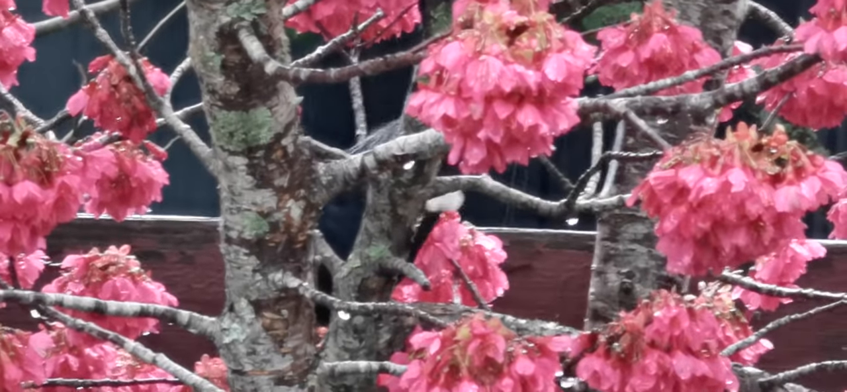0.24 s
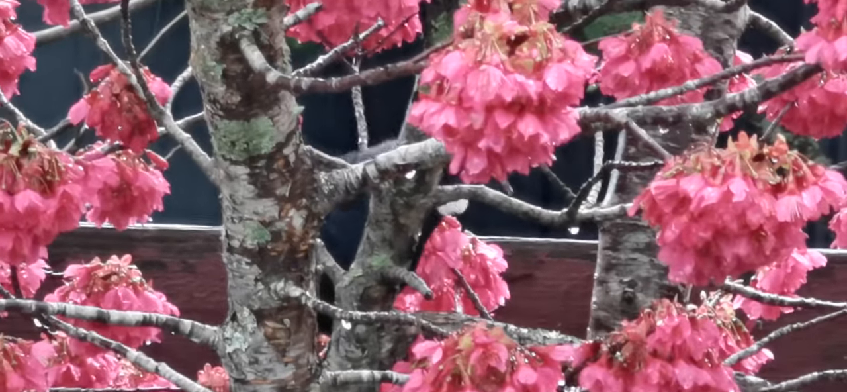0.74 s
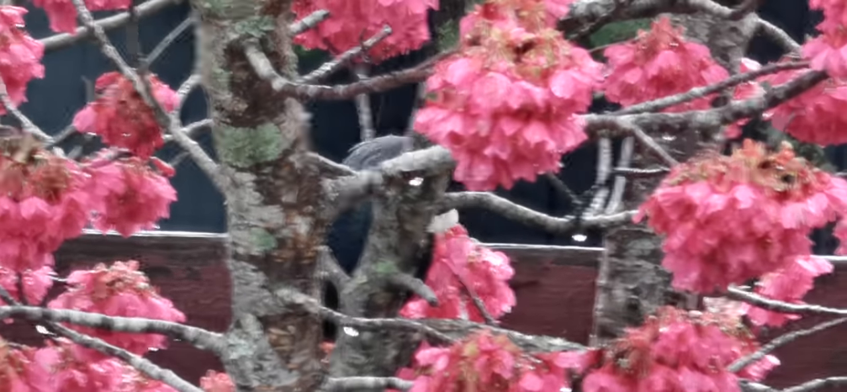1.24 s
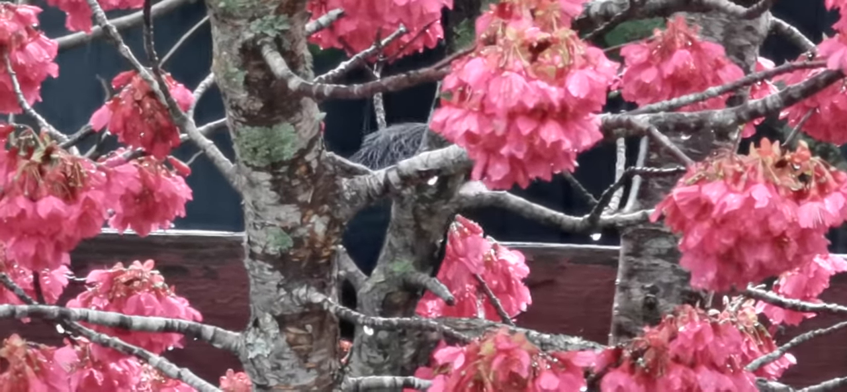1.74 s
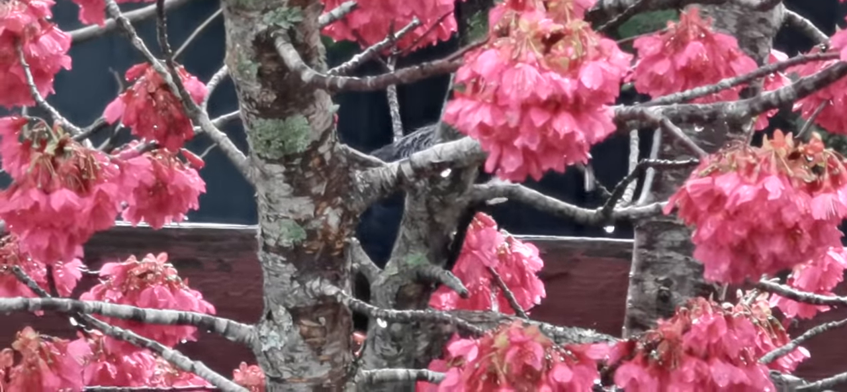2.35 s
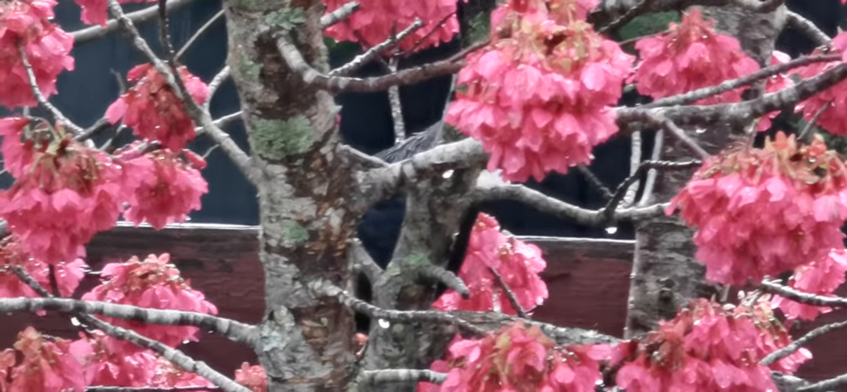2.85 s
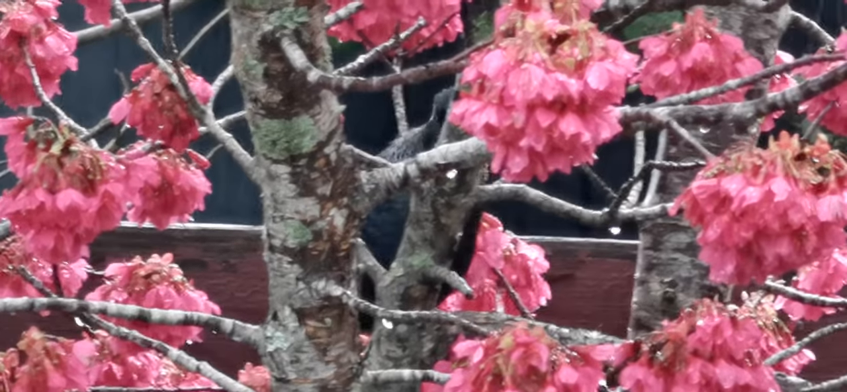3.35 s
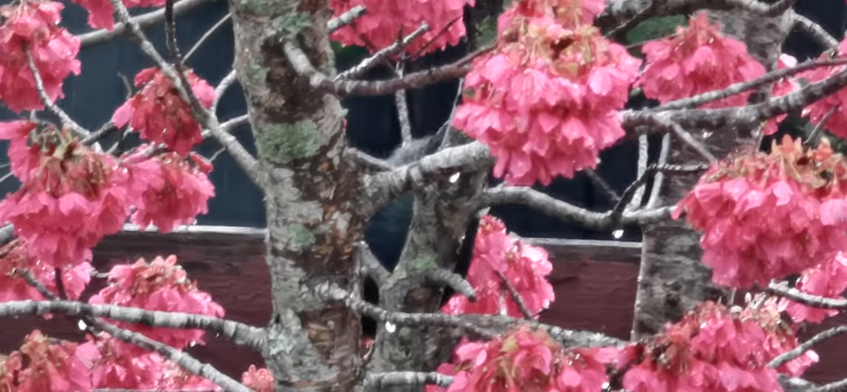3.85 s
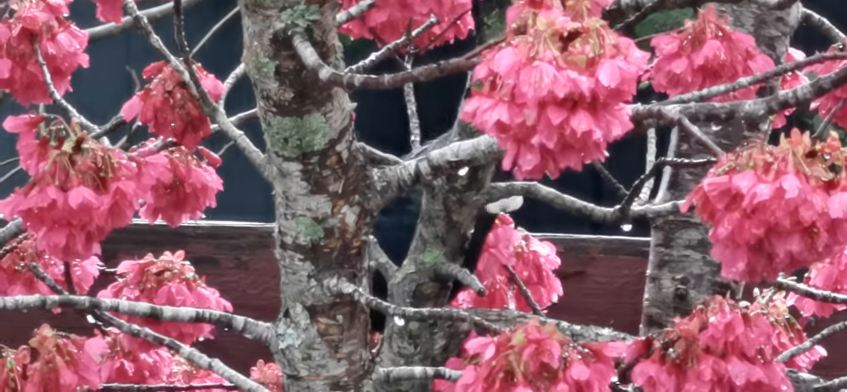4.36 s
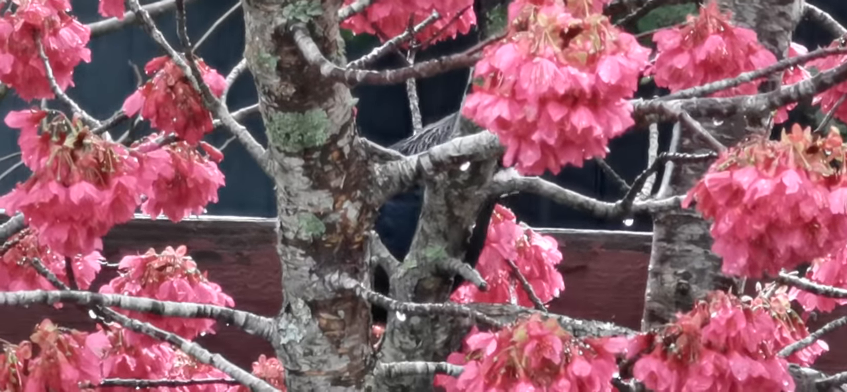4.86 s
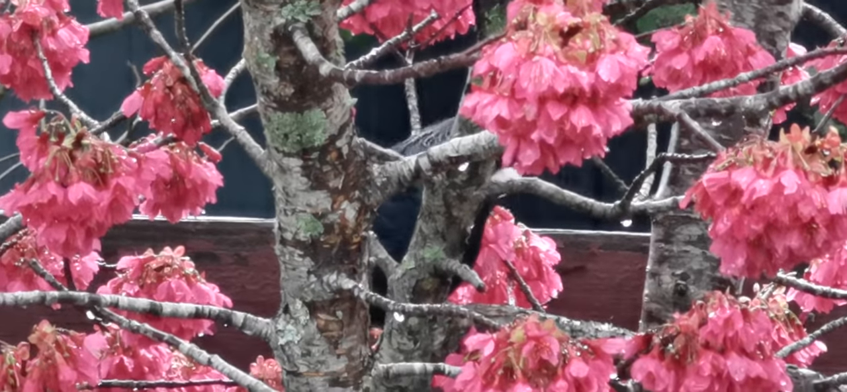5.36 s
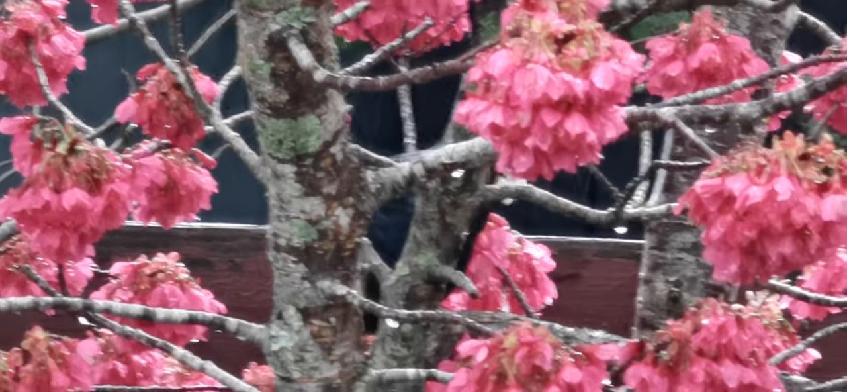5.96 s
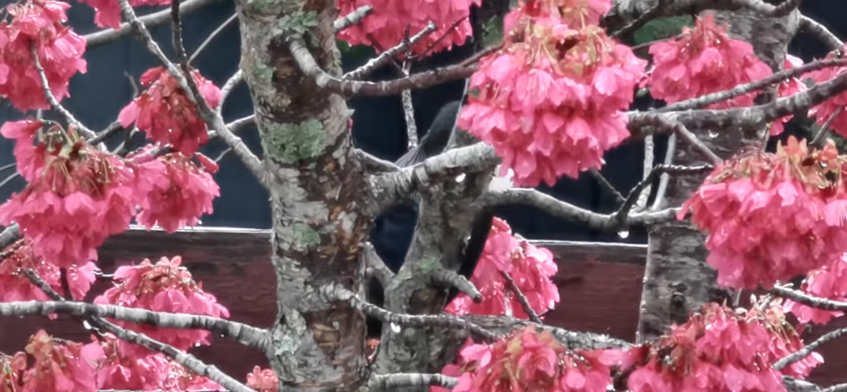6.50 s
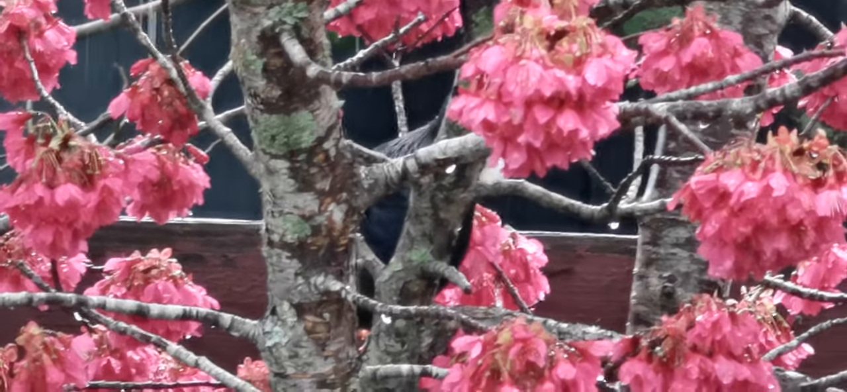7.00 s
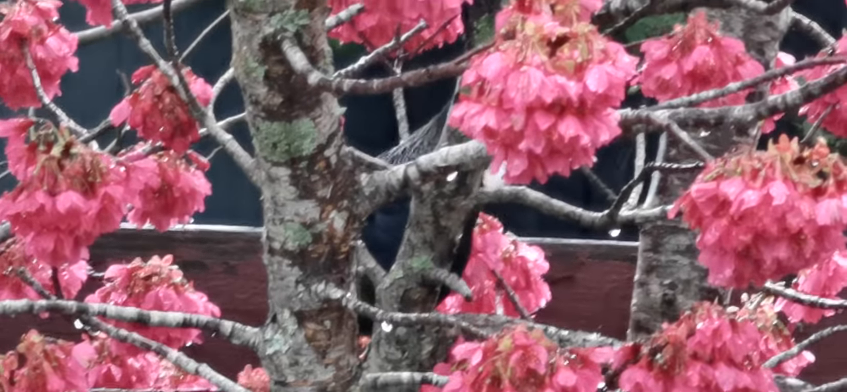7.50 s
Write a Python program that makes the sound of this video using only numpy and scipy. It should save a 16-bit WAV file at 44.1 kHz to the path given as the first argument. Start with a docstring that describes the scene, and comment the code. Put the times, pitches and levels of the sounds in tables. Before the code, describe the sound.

Over faint outdoor rumble and a distant machine's wavering hum, one bird calls from a tree just right of the microphone. Scattered high chirps, falling whistles and bell-like notes, often two pitches at once, mix with rasps and soft clicks. Two loud squawks about a second apart lead to a quick hollow rattle, then dense twittering and squeaks continue to the end. Each call has a short garden echo.

```python
"""A tui in a flowering cherry tree, close to a camera's stereo microphone and to its right.
Over faint rumble and a distant machine's hum it opens with pure bell notes, fast high chirps and
squeaks, often two at once from the two sides of its syrinx. Hoarse rasps join after a second, dry
clicks later. Two loud squawks at 3.6 and 4.7 s lead to a throaty rattle at 5.1 s, then the quick notes
run on to the end. All along, a fence and the trees around give a short echo."""
import sys
import numpy as np
from scipy import signal
from scipy.fft import rfft, irfft, next_fast_len
from scipy.io import wavfile
from scipy.ndimage import map_coordinates

SR = 44100
rng = np.random.default_rng(int(sys.argv[2]) if len(sys.argv) > 2 else 0)


def put_to_file(sound):
    """Save the sound as 16-bit audio at rate SR, in the file named by the first command-line argument."""
    columns = np.atleast_2d(sound).T  # one column per channel
    safe = np.clip(columns, -1, 1)
    whole_steps = np.round(safe * 32767)
    wavfile.write(sys.argv[1], SR, whole_steps.astype(np.int16))


N = 341334

# Levels in the tables are relative; each source sets its own gain on top.
# outdoor air: (frequency [Hz], level [dB])
AIR_SPECTRUM = [(20, -1), (150, -1), (500, -16.5), (800, -12.5), (1200, -21), (2000, -19.5), (3000, -22.5),
                (5000, -21), (8000, -29.5), (15500, -35.5)]
# how alike the outdoor rumble and hiss are at the two microphones: (frequency [Hz], likeness [0-1])
AIR_LIKENESS = [(100, 0.98), (400, 0.65), (2500, 0.22)]
# partials of the distant machine: (pitch [Hz], level [dB])
HUM_PARTIALS = [(119.5, -65.5), (159, -65), (199, -69.5)]
# drift of its hum: (time [s], level [dB])
HUM_DRIFT = [(0, -2), (1.2, -4), (1.5, 8.5), (1.9, -8.5), (2.65, 5), (3.1, -3.5), (6.9, 1.5), (7.2, 8.5),
             (7.5, -1.5)]

# held pure notes: (time [s], core length [s], pitch [Hz], level [dB])
BELL_NOTES = [(.01, 0.12, 6870, -62.5), (0.019, 0.094, 3413, -62), (0.04, 0.089, 1712, -62),
              (.098, 0.13, 2280, -62.5), (0.314, 0.04, 4897, -43), (1.355, 0.068, 4187, -50),
              (1.363, 0.074, 2613, -52.5), (1.37, 0.062, 1622, -58.5), (2.725, 0.073, 2094, -51.5),
              (2.975, 0.033, 1830, -57), (3.854, 0.082, 1058, -43), (3.727, 0.029, 425, -62.5),
              (3.998, 0.076, 365.4, -60), (4.08, 0.15, 530, -66), (4.094, 0.12, 1071, -46.5),
              (4.309, 0.045, 461, -61.5), (5.613, 0.022, 1333, -57.5), (5.615, 0.032, 4080, -59.5),
              (6.148, 0.036, 3563, -46), (6.151, 0.05, 10740, -59.5), (6.22, 0.1, 2070, -42.5),
              (6.919, 0.077, 940, -54), (6.955, 0.064, 4303, -59), (7.112, 0.053, 5100, -59),
              (7.114, .06, 2560, -66), (7.309, 0.31, 1082, -63.5), (7.651, 0.041, 3383, -59)]
# overtones let out by the beak: (frequency [Hz], level [dB])
BEAK_OVERTONES = [(2000, -13), (3000, -18.5), (4300, -9), (5600, -14), (8000, -26), (13000, -23),
                  (17000, -28)]
# air rushing through the syrinx: (frequency [Hz], level [dB])
HISS_SPECTRUM = [(600, -29), (2500, -8), (4200, -3), (5800, -2.5), (8200, -1.5), (9500, -10), (11000, -2),
                 (15500, -9)]
# rough sliding notes: (time [s], length [s], start pitch [Hz], end pitch [Hz], level [dB])
BUZZ_NOTES = [(.08, 0.066, 11900, 10200, -58), (0.542, .025, 5450, 5840, -51),
              (0.905, 0.04, 3760, 2614, -58.5), (1.172, .016, 5200, 6500, -45.5),
              (1.518, 0.066, 5500, 4870, -57.5), (1.612, 0.042, 3900, 4440, -55),
              (1.787, 0.012, 7400, 10000, -42.5), (2.214, 0.02, 1710, 967, -47),
              (2.247, .08, 4990, 5600, -57), (2.401, 0.035, 7200, 10000, -50.5),
              (3.042, 0.016, 5970, 4580, -49), (3.471, 0.095, 5110, 3440, -57.5),
              (4.882, .034, 1672, 1049, -33), (5.045, 0.057, 9470, 8440, -46.5),
              (5.876, .022, 7400, 9900, -48), (5.943, .03, 1650, 1297, -55),
              (5.958, 0.037, 3540, 2060, -48.5), (5.97, .04, 5260, 4530, -54.5),
              (6.197, 0.018, 5070, 6620, -48), (6.671, .055, 1750, 2400, -55.5),
              (6.723, .06, 4540, 5470, -60.5), (7.252, .05, 8280, 10480, -45),
              (7.281, 0.039, 1184, 716, -51.5), (7.388, 0.073, 5050, 5090, -56.5),
              (7.44, 0.026, 1745, 1214, -50.5), (7.565, .044, 8060, 6920, -53),
              (7.592, 0.031, 9400, 9970, -52)]
# clean falling notes: (time [s], length [s], start pitch [Hz], end pitch [Hz], level [dB])
SLUR_NOTES = [(0.116, 0.045, 9700, 8440, -48), (0.323, 0.077, 4500, 2810, -55),
              (0.476, .04, 9320, 6500, -46), (.555, 0.04, 9180, 6570, -49), (1.232, 0.36, 8750, 7830, -62),
              (1.272, 0.011, 6530, 5400, -44), (1.941, .038, 10440, 8170, -48.5),
              (2.207, .013, 6750, 3605, -47.5), (2.457, 0.058, 6400, 4580, -39.5),
              (2.51, .034, 4920, 3580, -48.5), (3.032, 0.018, 2000, 1782, -41),
              (3.263, .16, 2384, 2087, -50.5), (3.287, .13, 2043, 1930, -53),
              (3.845, 0.027, 8500, 6870, -54), (3.856, 0.019, 10650, 9300, -53),
              (3.988, 0.13, 5050, 4690, -59), (4.122, .032, 5900, 3890, -46),
              (4.233, 0.033, 1065, 964, -48), (4.253, 0.053, 5200, 4640, -55.5),
              (6.029, .034, 2640, 1867, -41.5), (6.34, 0.057, 6310, 4610, -47.5),
              (6.378, .14, 13900, 12900, -57), (6.379, 0.15, 9400, 8330, -50),
              (6.369, 0.13, 8300, 7700, -54), (6.375, 0.11, 4210, 3870, -57.5),
              (6.401, .11, 4600, 4300, -60.5), (7.193, 0.028, 3940, 3150, -55.5),
              (7.424, 0.11, 3350, 2740, -59.5), (7.684, 0.015, 2140, 1623, -42.5)]
# two-voiced notes: (time [s], length [s], upper pitch [Hz], upper level [dB], lower pitch [Hz],
# lower level [dB], jitter [ratio])
SQUEAK_NOTES = [(0.262, 0.042, 6395, -38.5, 5100, -72, 0.0012),
                (0.771, 0.095, 7710, -41.5, 5090, -42.5, 0.03), (1.79, .16, 10090, -43, 5280, -55, 0.025),
                (2.105, 0.11, 6600, -50, 3990, -53, 0.014), (2.408, 0.056, 10360, -54, 4890, -59, 0.0086),
                (2.705, 0.02, 6390, -38, 4460, -63, .016), (5.441, 0.066, 6450, -43, 5050, -42, .013),
                (5.882, .1, 9420, -53.5, 5820, -46.5, 0.015),
                (6.118, 0.054, 7200, -62.5, 5720, -54, 0.0086), (6.398, 0.11, 11850, -57, 6540, -57, 0.021),
                (6.721, 0.071, 8200, -59, 3890, -53.5, 0.014)]
# repeated chirps: (time [s], repeats [count], period [s], length [s], start pitch [Hz], end pitch [Hz],
# jitter [ratio], level [dB])
TWITTER_RUNS = [(.766, 3, .021, 0.012, 6770, 8100, 0.013, -38),
                (1.13, 2, 0.092, 0.053, 5290, 4380, 0.05, -47),
                (4.337, 6, .048, .018, 8300, 10520, 0.058, -48.5),
                (4.346, 5, .053, 0.042, 5650, 6600, 0.038, -49),
                (5.731, 5, 0.033, 0.026, 4324, 2070, .038, -54),
                (5.732, 5, 0.032, 0.032, 8010, 6660, 0.06, -51.5),
                (6.791, 3, .047, 0.0261, 2436, 1863, 0.024, -52.5),
                (6.777, 3, 0.054, 0.027, 4730, 5400, .056, -55),
                (6.819, 2, .049, 0.022, 7640, 9400, 0.058, -48)]

# hoarse calls: (time [s], length [s], throat level [dB], beak level [dB], hiss level [dB], hiss top [Hz])
RASP_CALLS = [(1.135, 0.044, -89, -55, -49.5, 15400), (1.23, .032, -87, -50, -52, 15000),
              (1.781, 0.22, -73, -74, -54.5, 13600), (5.236, 0.04, -42.5, -40, -49, 12000),
              (5.722, 0.18, -61, -60.5, -58, 9100)]
# resonances of the throat and of the beak: (frequency [Hz], level [dB])
THROAT_SPECTRUM = [(500, -56), (900, -58), (1200, -9.5), (1450, 0), (1750, 6), (2150, 7), (2330, 4.5),
                   (2600, -22), (3200, -3), (4200, -97)]
BEAK_SPECTRUM = [(2600, -62), (3100, -41), (3500, -8), (4350, -9.5), (4680, 3), (5100, -2), (5950, -5.5),
                 (7200, -23)]
# dry clicks: (time [s], level [dB])
CLICK_HITS = [(2.6152, -58), (3.202, -72), (4.004, -66), (5.627, -64.5), (6.941, -63.5), (7.135, -66.5)]
# colour of a click: (frequency [Hz], level [dB])
CLICK_SPECTRUM = [(590, -41), (1000, -6), (1610, -19.5), (2240, 7.5), (2930, -6.5), (7180, -0.5),
                  (8810, -12), (15000, -24)]
# course of each squawk: (time [s], throat level [dB], pitch [Hz], beak level [dB], hiss level [dB])
SQUAWK_PATHS = [
    [(3.588, -38, 1880, -55, -57), (3.592, -34.5, 1892, -45, -59), (3.608, -31, 1794, -52, -50),
     (3.638, -31, 1854, -46, -38), (3.672, -38.5, 2040, -55, -41.5), (3.715, -69, 2080, -67, -44)],
    [(4.684, -40, 1806, -43, -37), (4.692, -30, 1805, -47, -43.5), (4.728, -31.5, 1912, -39, -37),
     (4.782, -29, 2166, -41.5, -40), (4.872, -28, 2037, -39, -48), (4.9, -44, 2020, -46, -50)],
]
# for each squawk: (hiss top [Hz])
SQUAWK_HISS_TOPS = [15400, 10100]
# for each squawk: (growl [yes/no])
SQUAWK_HAS_GROWL = [True, False]
# strength of the rattle: (time [s], knock level [dB], crack level [dB])
RATTLE_LEVELS = [(5.113, -42, -73), (5.128, -36.5, -35.5), (5.16, -30, -26), (5.225, -32, -22.5),
                 (5.263, -33.5, -32)]
# low resonances of its knock: (frequency [Hz], twice the bandwidth [Hz], level [dB])
KNOCK_MODES = [(781, 130, 1.5), (1450, 96, -27), (2363, 68, -9)]
# colour of its crack: (frequency [Hz], level [dB])
CRACK_SPECTRUM = [(300, -45), (1500, -9), (3200, -18.5), (4700, 2.5), (5400, 3), (6100, -4), (7000, 0.5),
                  (8200, -9.5), (11500, -11), (15500, -15)]

# direct song at the left microphone against the right: (frequency [Hz], level [dB])
LEFT_SHADE = [(450, -2.5), (800, 3), (1060, -13.5), (1450, -3.5), (2080, -13.5), (2700, -8.5), (3500, 2.5),
              (4200, -3.5), (5000, -4), (6400, -5.5), (7600, -8.5), (8800, -8.5), (10200, -24),
              (15000, -35)]
# echo off fence and trees: (frequency [Hz], time to fall 60 dB [s])
GARDEN_DECAY = [(500, 0.33), (2000, 0.39), (5000, 0.36), (9000, 0.31), (15000, 0.28)]


def amp(db):
    """Decibels to gain."""
    return 10 ** (np.asarray(db) / 20)


def unit(x):
    """x at rms 1."""
    return x / np.sqrt(np.mean(x ** 2) + 1e-20)


def along(points, hz):
    """(frequency [Hz], value) points read on a log axis."""
    frequencies, values = np.transpose(points)
    return np.interp(np.log(hz + 1), np.log(frequencies + 1), values)


def wobble(rate, size):
    """A smooth random curve with rate knots a second."""
    knots = rng.standard_normal(int(size * rate / SR) + 4)
    return map_coordinates(knots, [np.arange(size) * rate / SR])


def filtered(x, response):
    """x through a frequency response."""
    size = x.shape[-1]
    padded = next_fast_len(size + 4096)
    return irfft(rfft(x, padded) * response(np.fft.rfftfreq(padded, 1 / SR)), padded)[..., :size]


def coloured(x, spectrum):
    """x shaped by a spectrum, at rms 1."""
    return unit(filtered(x, lambda hz: amp(along(spectrum, hz))))


def clock(length):
    """Sample times of a sound."""
    return np.arange(int(length * SR)) / SR


def swell(t, rise, fall):
    """An envelope with rounded ends."""
    onset, release = np.clip(t / rise, 0, 1), np.clip((t[-1] - t) / fall, 0, 1)
    return (np.sin(np.pi / 2 * onset) * np.sin(np.pi / 2 * release)) ** 2


def add(out, s, x):
    """Mix a sound in at time s."""
    start = round(s * SR)
    x = x[:max(N - start, 0)]
    out[start:start + len(x)] += x


def tone(hz, overtone_db):
    """Almost a sine, purer the higher it goes."""
    phase = 2 * np.pi * np.cumsum(hz) / SR
    overtone = amp(overtone_db) / (1 + (hz / 6500) ** 4) * np.sin(2 * phase)
    return np.sqrt(2) * (np.sin(phase) + overtone)


def background():
    """Outdoor rumble and faint hiss, with the wavering hum of a distant machine."""
    def mid_and_side(hz):
        spread = np.arccos(along(AIR_LIKENESS, hz)) / 2
        return amp(along(AIR_SPECTRUM, hz)) * [np.cos(spread), np.sin(spread)]
    mid, side = filtered(rng.standard_normal((2, N)), mid_and_side)
    air = amp(-54.5 + .7 * wobble(3, N)) * unit(np.array([mid + side, mid - side]))
    drift_db = np.interp(np.arange(N) / SR, *np.transpose(HUM_DRIFT))
    hum = sum(amp(db + 2 * wobble(4, N)) * tone(hz + 2.5 * wobble(9, N), overtone_db=-30)
              for hz, db in HUM_PARTIALS)
    return (air + amp(drift_db) * hum) * amp([[.9], [-.9]])  # a little louder on the left


def bells():
    """One side of the syrinx holds a note that swells gently, arches in pitch and barely wavers."""
    out = np.zeros(N)
    for s, core, hz, db in BELL_NOTES:
        t = clock(1.36 * core)
        arch = np.sin(np.pi * t / t[-1]) - 2 / np.pi
        pitch = hz * (1 + .0019 * wobble(39.5, len(t)) + .018 * arch)
        envelope = swell(t, rise=.5 * core, fall=.35 * core)
        add(out, s, amp(db + 4) * envelope * tone(pitch, overtone_db=-33))
    return out


def chirp(pitch, jitter):
    """A note on a pitch path; an unsteady membrane roughens it and lets air hiss past."""
    t = np.arange(len(pitch)) / SR
    unsteady_hz = pitch * (1 + .96 * jitter * wobble(705.7, len(t)))
    phase = 2 * np.pi * np.cumsum(unsteady_hz) / SR
    voice = np.sin(phase)
    for k in (2, 3):
        voice += amp(along(BEAK_OVERTONES, k * pitch)) * (k * pitch < SR / 2) * np.sin(k * phase) / (k - 1)
    flutter = unit(amp(84 * jitter * wobble(354.6, len(t)) + 2.3 * wobble(51.4, len(t))))
    hiss_gain = amp(-18 + 166 * jitter) * pitch / 8000  # more air in rough, high notes
    hiss = hiss_gain * coloured(rng.standard_normal(len(t)), HISS_SPECTRUM)
    return swell(t, .064 * t[-1], .046 * t[-1]) * flutter * (np.sqrt(2) * voice + hiss)


def slide(length, start_hz, end_hz, bend=.8):
    """Pitch between two notes; a bend under 1 starts fast and eases off."""
    t = clock(length)
    return start_hz * (end_hz / start_hz) ** ((t / t[-1]) ** bend)


def buzzes():
    """Slides made rough by a very unsteady membrane."""
    out = np.zeros(N)
    for s, length, start_hz, end_hz, db in BUZZ_NOTES:
        add(out, s, amp(db) * chirp(slide(length, start_hz, end_hz), jitter=.043))
    return out


def slurs():
    """Clean falling notes, loudest midway; the faster the slide, the less steady the pitch."""
    out = np.zeros(N)
    for s, length, start_hz, end_hz, db in SLUR_NOTES:
        octaves_per_s = abs(np.log2(start_hz / end_hz)) / length
        note = chirp(slide(length, start_hz, end_hz), jitter=.006 + .0005 * octaves_per_s)
        arch_db = 4 * (1 / 3 - np.linspace(-1, 1, len(note)) ** 2)
        add(out, s, amp(db + arch_db) * note)
    return out


def squeaks(scoop_s=.005, scoop_db=-4):
    """Both sides of the syrinx start flat and soft, then scoop up together, each to its own pitch."""
    out = np.zeros(N)
    for s, length, upper_hz, upper_db, lower_hz, lower_db, jitter in SQUEAK_NOTES:
        slack = np.exp(-clock(length) / scoop_s)
        scoop = 1 - .105 * slack
        upper = amp(upper_db) * chirp(upper_hz * scoop, jitter)
        lower = amp(lower_db) * chirp(lower_hz * scoop, 1.23 * jitter)
        add(out, s, amp(scoop_db * slack) * (upper + lower))
    return out


def twitters():
    """One slide repeated at a steady beat, each time at a slightly different pitch."""
    out = np.zeros(N)
    for s, repeats, period, length, start_hz, end_hz, jitter, db in TWITTER_RUNS:
        for k in range(repeats):
            pitch = slide(length, start_hz, end_hz) * rng.normal(1, .0126)
            add(out, s + k * period, amp(db) * chirp(pitch, jitter))
    return out


def rasp(t, throat_db, beak_db, hiss_db, top_hz):
    """The syrinx slaps at an unsteady rate and rings throat and beak; air hisses after each slap."""
    slap_hz = 240 * np.exp(.16 * wobble(150, len(t)))
    cycle = np.cumsum(slap_hz) / SR % 1
    air = (np.exp(-cycle / .35) + .45) * rng.standard_normal(len(t))
    slaps = (np.diff(cycle, prepend=1) < 0) + .06 * air
    throat = amp(throat_db) * coloured(slaps, THROAT_SPECTRUM)
    beak = amp(beak_db) * coloured(slaps, BEAK_SPECTRUM)
    soft_air = filtered(air, lambda hz: 1 / (1 + (hz / top_hz) ** 10))
    hiss = amp(hiss_db - 1.5) * coloured(soft_air, HISS_SPECTRUM)
    return swell(t, rise=.0004, fall=.0055) * (throat + beak + hiss)


def rasps():
    """Short hoarse calls at an even effort."""
    out = np.zeros(N)
    for s, length, *voice in RASP_CALLS:
        add(out, s, rasp(clock(length), *voice))
    return out


def clicks():
    """Short dry ticks between the notes."""
    out, t = np.zeros(N), clock(.026)
    decay = amp(-60 * t / .035)
    for s, db in CLICK_HITS:
        add(out, s, amp(db + 15.5) * decay * coloured(rng.standard_normal(len(t)), CLICK_SPECTRUM))
    return out


def squawks(jitter=.031, growl_db=-9, throat_top_hz=3370):
    """Two hard rasps around a rough tone muffled by the throat; the first growls an octave below."""
    out = np.zeros(N)
    for path, top_hz, growls in zip(SQUAWK_PATHS, SQUAWK_HISS_TOPS, SQUAWK_HAS_GROWL):
        times, *columns = np.transpose(path)
        t = clock(times[-1] - times[0])
        throat_db, pitch, beak_db, hiss_db = [np.interp(times[0] + t, times, c) for c in columns]
        voice = chirp(pitch, jitter) + growls * amp(growl_db) * chirp(pitch / 2, 2 * jitter)
        muffled = filtered(voice, lambda hz: 1 / (1 + (hz / throat_top_hz) ** 6))
        harsh = rasp(t, throat_db - 4.5, beak_db + 1.5, hiss_db - 1.5, top_hz)
        add(out, times[0], amp(throat_db - 2.5) * muffled + harsh)
    return out


def rattle(start_s=5.113, period_s=.0139, slowing_s=.00011, count=11):
    """Slowing pulses, each a hollow knock choked as the syrinx shuts, with a rough crack on top."""
    out, t = np.zeros(N), clock(.042)
    gate = (1 - np.exp(-t / .0012)) / (1 + (t / .011) ** 8)
    knock = gate * sum(amp(db) * np.exp(-np.pi * width * t / 2) * np.sin(2 * np.pi * hz * t)
                       for hz, width, db in KNOCK_MODES)
    times, *levels = np.transpose(RATTLE_LEVELS)
    for k in range(count):
        s = start_s + period_s * k + slowing_s * k ** 2
        knock_db, crack_db = [np.interp(s, times, level) for level in levels]
        crack = coloured(rng.standard_normal(len(t)), CRACK_SPECTRUM) * amp(-60 * t / .05)
        add(out, s, amp(knock_db + rng.normal(0, 1)) * knock + amp(crack_db - 6.5) * crack)
    return out


def placed(x):
    """The bird sits close on the right; each pitch divides between the microphones in its own way."""
    def gains(hz):
        left = amp(along(LEFT_SHADE, hz))
        return np.array([left, np.ones_like(left)]) * np.sqrt(2 / (1 + left ** 2))
    return filtered(x, gains)


def garden(song):
    """Fence, trunks and blossom around the microphone scatter the song into a short diffuse tail."""
    hz, t, noise = signal.stft(rng.standard_normal((2, SR // 2)), SR, nperseg=256)
    early = .67 * amp(-60 * t / .14)
    late = amp(-60 * t / along(GARDEN_DECAY, hz)[:, None])
    onset = 1 - np.exp(-t / .0017)
    tail = signal.istft(noise * (early + late) * onset, SR, nperseg=256)[1]
    tail /= np.linalg.norm(tail, axis=1, keepdims=True)
    crossed = .97 * song + .26 * song[::-1]  # each side spills into the other
    return signal.fftconvolve(crossed, tail, axes=1)[:, :N]


def scene():
    """The song reaches the right microphone just before the left; rattle and clicks reach both at once."""
    held = placed(bells())
    quick = placed(slurs() + buzzes() + twitters() + squeaks() + rasps() + squawks())
    pulses = placed(rattle() + clicks())
    delay_s = .00043 * np.array([[.5], [-.5]])  # left late, right early
    direct = filtered(held + quick, lambda hz: np.exp(-2j * np.pi * hz * delay_s))
    echo = garden(quick + .9 * (held + pulses))
    return direct + pulses + echo + background()


def record(dry, top_hz=15820):
    """The camera keeps nothing above its band limit."""
    return filtered(dry, lambda hz: hz < top_hz)


dry = scene()
out = record(dry)
put_to_file(out)
```